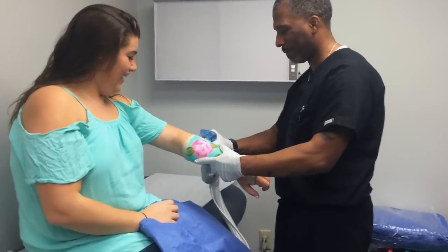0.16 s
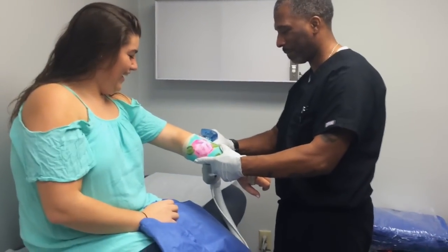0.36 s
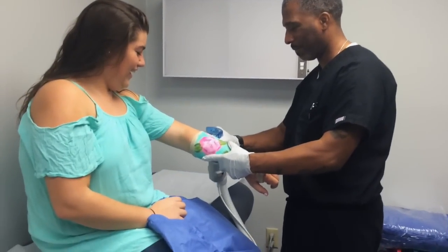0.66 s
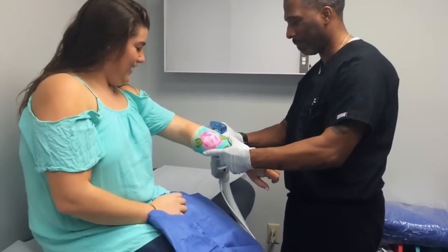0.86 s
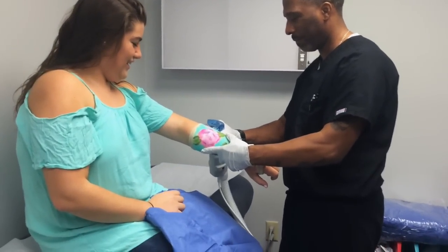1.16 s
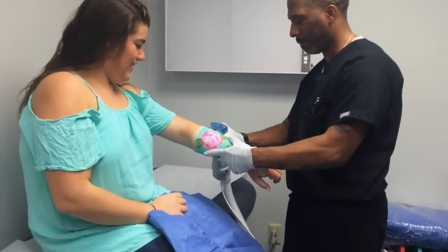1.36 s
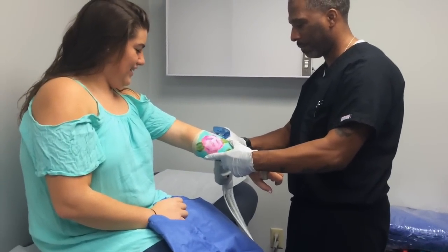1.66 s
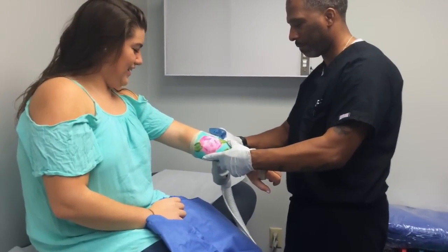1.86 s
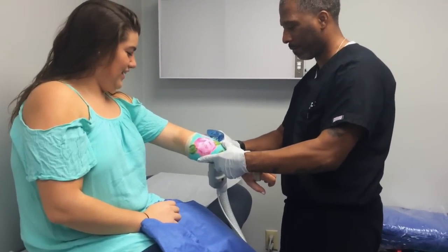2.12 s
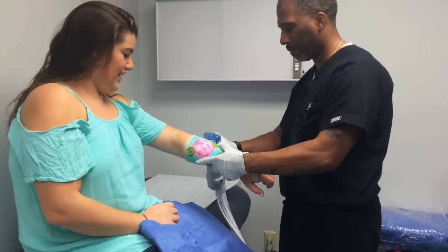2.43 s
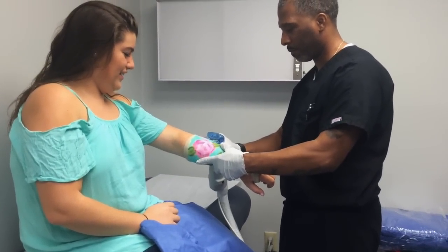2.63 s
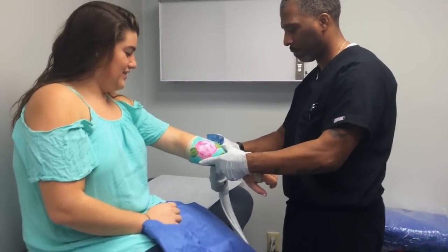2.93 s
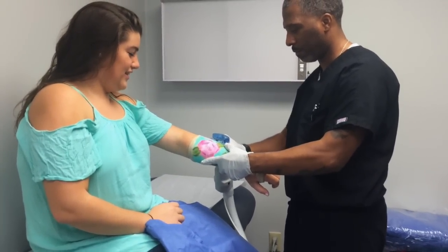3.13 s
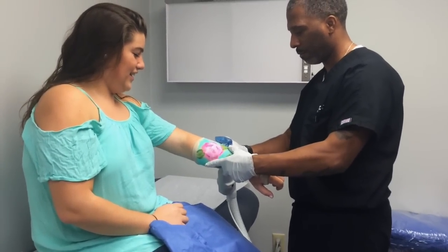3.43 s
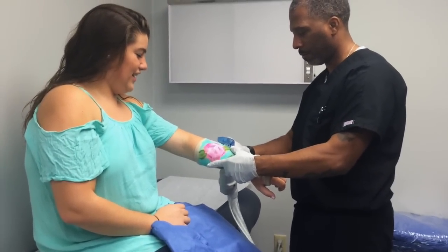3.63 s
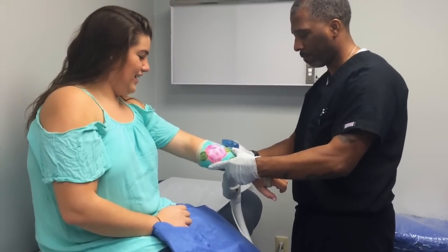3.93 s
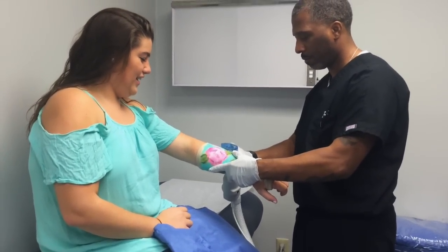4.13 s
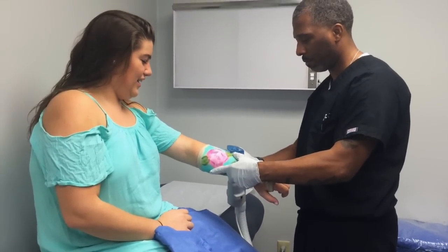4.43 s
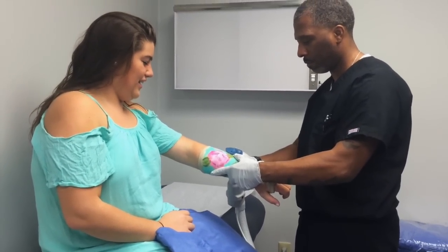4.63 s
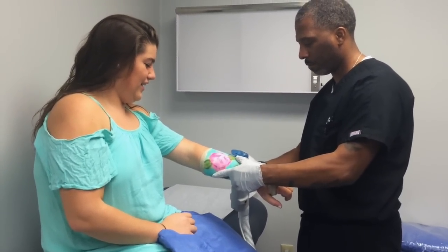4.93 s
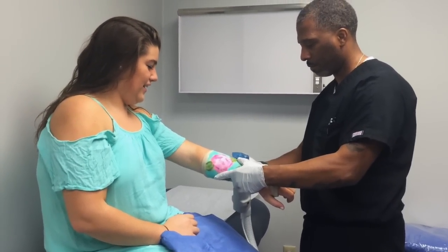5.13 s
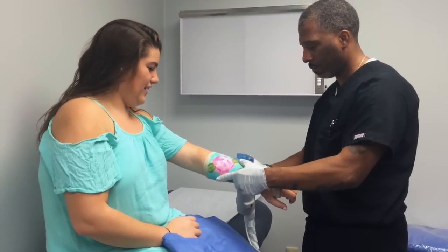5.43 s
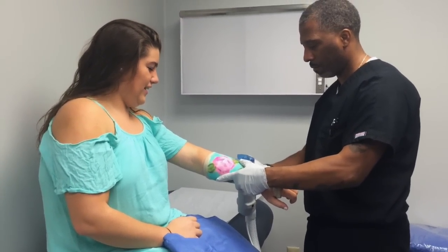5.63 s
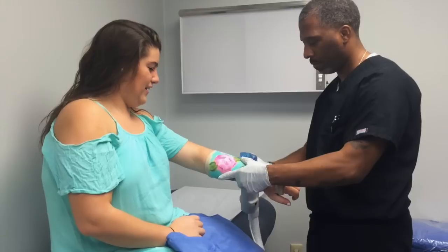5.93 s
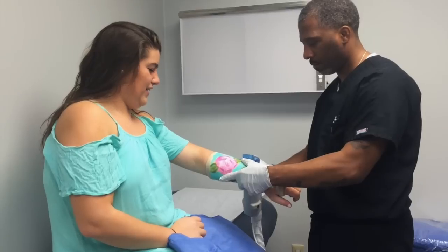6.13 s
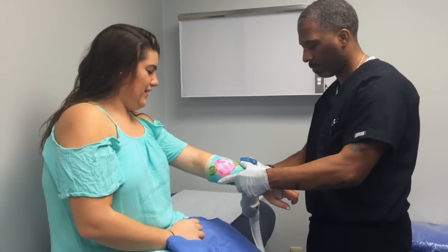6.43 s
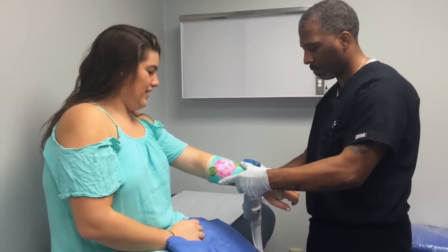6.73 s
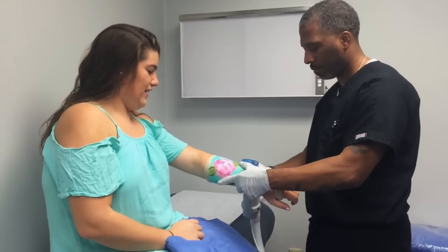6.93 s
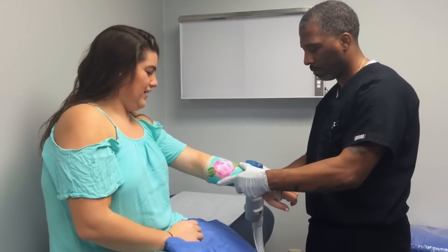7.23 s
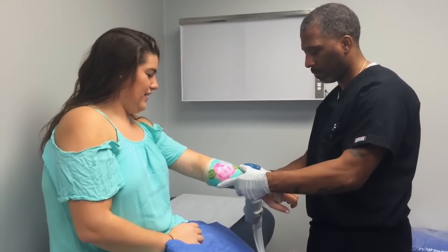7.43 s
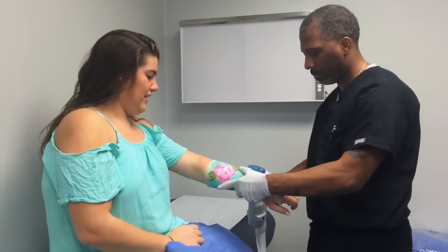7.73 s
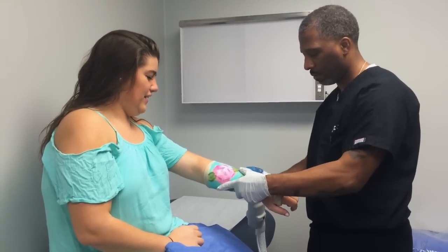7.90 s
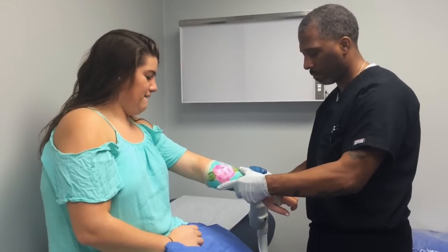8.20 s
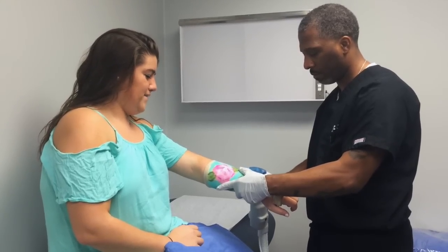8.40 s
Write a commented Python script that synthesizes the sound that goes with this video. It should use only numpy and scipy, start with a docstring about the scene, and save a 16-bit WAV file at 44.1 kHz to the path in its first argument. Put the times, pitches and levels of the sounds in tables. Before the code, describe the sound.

A cast saw is already running, its harsh buzzing whine jumping between overtones as the blade catches and slips. Early bites bring low, hollow grumbles and stronger buzzing from the cast; later the cutting becomes higher and more singing, with longer squeals. Dry dust scrapes throughout, over constant vacuum hum and airy hiss. Close, centred sound in a small hard room, still running at the end.

```python
"""Cast saw and dust vacuum

An oscillating saw is pressed again and again into a cast on a forearm, in a small clinic room.
Each press slows the motor; the blade sings on multiples of its stroke rate, made of trembling sines.
Gated noise through resonances chatters against the shell; coloured noise rasps off dust.
The dust vacuum runs beside it: sines hum and whistle, and filtered noise rushes."""
import sys
import numpy as np
from scipy import signal
from scipy.fft import rfft, irfft
from scipy.io import wavfile
from scipy.ndimage import uniform_filter1d

SR = 44100
rng = np.random.default_rng(int(sys.argv[2]) if len(sys.argv) > 2 else 0)


def put_to_file(sound):
    """Save the sound as 16-bit audio at rate SR, in the file named by the first command-line argument."""
    columns = np.atleast_2d(sound).T  # one column per channel
    safe = np.clip(columns, -1, 1)
    whole_steps = np.round(safe * 32767)
    wavfile.write(sys.argv[1], SR, whole_steps.astype(np.int16))


N = 377496
TIME = np.arange(N) / SR


def undb(db):
    """Decibels to gain."""
    return 10 ** (np.asarray(db) / 20)


def unit(x):
    """Scale to rms 1."""
    return x / np.sqrt(np.mean(x ** 2))


def curves(table):
    """Each column of a table after the first, joined by straight lines in time."""
    time_s, *columns = np.transpose(table)
    return [np.interp(TIME, time_s, column) for column in columns]


def walk(rate_hz):
    """Smooth random curve of rms 1 that changes about rate_hz times a second."""
    step = max(int(SR / rate_hz), 2)
    held = np.repeat(rng.standard_normal(N // step + 2), step)
    held = held[rng.integers(step):][:N]
    return unit(uniform_filter1d(uniform_filter1d(held, step), step))


def turn(hz):
    """Phase in radians of something turning at a changing rate, from a random start."""
    return 2 * np.pi * (np.cumsum(hz) / SR + rng.random())


def press(slowest_s, push_s, release_s):
    """One smooth push and release, 0-1."""
    u = (TIME - slowest_s) / np.where(TIME < slowest_s, push_s, release_s)
    return np.cos(np.pi / 2 * np.clip(u, -1, 1)) ** 2


def hold(start_s, length_s, edge_in_s=0.02, edge_out_s=0.019):
    """Attack, hold and release, 0-1; the ramps are centred on the start and the end."""
    attack = (TIME - start_s) / edge_in_s
    release = (start_s + length_s - TIME) / edge_out_s
    return np.clip(np.minimum(attack, release) + .5, 0, 1)


def bump(centre_s, length_s):
    """A short bell-shaped swell, 0-1."""
    return np.exp(-(2 * (TIME - centre_s) / length_s) ** 2)


def colour(x, points):
    """Give a sound an extra spectrum, joined in log frequency; rms 1."""
    hz, db = np.transpose(points)
    f = np.maximum(np.fft.rfftfreq(N, 1 / SR), 1)
    shape = undb(np.interp(np.log(f), np.log(hz), db))
    return unit(irfft(rfft(x) * shape, N))


def resonate(x, hz, width_hz):
    """A resonance applied twice, for steep skirts."""
    b, a = signal.iirpeak(hz, hz / width_hz, fs=SR)
    return signal.lfilter(b, a, signal.lfilter(b, a, x))


def room(x, t60_s=.3, tail_db=3):
    """Direct sound plus a short, dense decaying tail from the near walls; rms 1."""
    t = TIME[:SR // 2]
    tail = rng.standard_normal(len(t)) * undb(-60 * t / t60_s) * (t > .004)
    tail = tail / np.linalg.norm(tail)
    return unit(x + undb(tail_db) * signal.fftconvolve(x, tail)[:N])


# lines of the vacuum's motor: multiple [of shaft speed], level_db [rms, before a slight waver]
VACUUM_LINES = [(1, -43.5), (2, -62), (3, -47), (6, -42), (9, -60), (12, -54)]
# thin whistles, joined over time: time_s, upper_db, lower_db [both before a 0.5 dB trim and a waver]
WHISTLE_LEVELS = [(0, -37, -51), (0.598, -44, -42), (1, -52, -56), (1.5, -56, -55), (1.8, -53, -44),
                  (2.8, -52, -42), (3.3, -57, -55), (4, -53, -57), (4.35, -43, -59), (5.9, -41, -57),
                  (6.5, -47, -52), (7.5, -47, -52), (8.56, -50, -52)]
# mean pitch of the whistles: upper_hz, lower_hz
WHISTLE_PITCHES = (6795, 6670)
# colour of the air rush: pitch_hz, level_db [per Hz, relative]
AIR_SPECTRUM = [(20, -36), (40, -23), (52, -14), (66, -1.5), (90, -12), (180, -6), (290, -10), (400, -5),
                (560, -11.5), (1050, -6.5), (2000, -2.5), (5000, -2), (9000, -6), (15000, -26.5)]


def vacuum(shaft_hz=303.5, drift=0.000393, air_db=-33):
    """A motor with a few clean lines, two thin whistles sharing its drift, and air rushing in the hose."""
    speed = 1 + drift * walk(2)
    shaft = turn(shaft_hz * speed)
    hum = 0
    for multiple, db in VACUUM_LINES:
        waver_db = .5 * np.sqrt(multiple) * walk(3.95)  # the higher lines waver more
        hum = hum + undb(db + waver_db) * np.sin(multiple * shaft)
    whistles = 0
    for hz, db in zip(WHISTLE_PITCHES, curves(WHISTLE_LEVELS)):
        whistles = whistles + undb(db - 0.5 + 0.77 * walk(14)) * np.sin(turn(hz * speed))
    air = colour(rng.standard_normal(N), AIR_SPECTRUM) * undb(air_db + 0.13 * walk(5.5))
    return np.sqrt(2) * (hum + whistles) + air  # root 2 turns rms into sine peak


# deep bites into the cast: centre_s, length_s, grumble_db, buzz_db [added gain of the cast's buzz]
BITES = [(0.728, 0.073, -44, -45), (1.35, .12, -47, -47), (1.894, 0.21, -48, -50), (2.39, 0.08, -49, -42),
         (2.524, 0.21, -62, -40), (2.988, 0.14, -56, -41.5), (3.507, 0.1, -54, -38)]


def grumble():
    """Deep bites shake the whole cast in a low, hollow resonance."""
    swell = sum(undb(db) * bump(s, length) for s, length, db, _ in BITES)
    return swell * unit(resonate(rng.standard_normal(N), 358, 80))


# colour of the torn grains: pitch_hz, level_db [per Hz, relative]
RASP_SPECTRUM = [(300, -23.5), (700, -7.5), (1200, -1.5), (2000, 2.5), (2900, -1.5), (4200, -3.5),
                 (5200, -3.5), (6500, -5), (7200, -2.5), (8000, -4), (9200, -11), (12000, -11.5),
                 (15200, -16.5)]
# rasp between presses, joined over time: time_s, level_db [before a fixed trim_db lift]
RASP_LEVELS = [(0, -33), (1.5, -34.5), (3.2, -32.2), (5, -31), (8.56, -32.5)]


def rasp(stroke, tearing_db, depth=0.34, grain_db=2, flicker_db=1.0, trim_db=2.5):
    """The teeth tear off fine grains, most at one end of the swing and more in each press."""
    level_db = curves(RASP_LEVELS)[0] + tearing_db + 0.26 * walk(15)
    grains = rng.standard_normal(N) * undb(grain_db * walk(2000) + flicker_db * walk(35))
    swung = grains * (1 + depth * np.cos(stroke))
    return room(colour(swung, RASP_SPECTRUM)) * undb(level_db + trim_db)


# resonances of blade and shell: pitch_hz, width_hz [of each of two passes], level_db [relative]
SHELL = [(1048, 190, -3), (1380, 530, -5), (1526, 294, 3.5), (2036, 350, -0.5), (3950, 1600, -5)]


def chatter(stroke, load, scatter_db=5.5, load_db=0.3, chatter_db=-33.0):
    """Once a stroke the teeth catch and knock the shell, never twice alike."""
    cycle = stroke / (2 * np.pi) % 1
    gate = np.exp(-cycle / 0.18)
    knocks = gate * rng.standard_normal(N) * undb(scatter_db * walk(250))
    shell = sum(undb(db) * resonate(knocks, hz, width) for hz, width, db in SHELL)
    return room(shell) * undb(chatter_db + load_db * load)


def overtone(phase, swell_db, rough):
    """One line of the saw, rms 1: it swells and drops as the contact shifts, and trembles with the scraping."""
    # tanh makes it stay near one level, then slip to another
    grip = undb(swell_db * np.tanh(2 * walk(18)))
    phase = phase + 2 * np.pi * rng.random()  # shell and walls delay each line differently
    in_step = (1 + rough * walk(80)) * np.cos(phase)
    quarter_turn = rough * walk(80) * np.sin(phase)
    return unit(grip * (in_step + quarter_turn))


# the saw's motor hum: multiple [of stroke rate], level_db [before slips]
MOTOR_LINES = [(1, -55), (2, -53)]
# the cast's low buzz: multiple [of stroke rate], level_db [relative to the shaking]
BUZZ_LINES = [(3, -1), (4, 3)]


def buzz(stroke, sag_hz, shake_db=-48, shake_db_per_hz=0.37):
    """The motor hums at low multiples of its stroke; the cast buzzes more under pressure and in deep bites."""
    motor = sum(undb(db) * overtone(k * stroke, swell_db=2.2, rough=0.12) for k, db in MOTOR_LINES)
    cast = sum(undb(db) * overtone(k * stroke, swell_db=1.5, rough=0.41) for k, db in BUZZ_LINES)
    shake = undb(shake_db + shake_db_per_hz * sag_hz)
    shake = shake + sum(undb(db) * bump(s, length) for s, length, _, db in BITES)
    return motor + shake * cast


# steady whine, joined over time, before swells and slips:
# time_s, fifth_db, sixth_db, middle_db [seventh and eighth], upper_db [common level of the overtones]
WHINE_LEVELS = [(0, -30.5, -33, -33, -29), (.8, -28.5, -31, -33.5, -27.5), (1.1, -35.5, -25.5, -31.5, -27),
                (2.2, -34, -27.5, -33.5, -28), (2.7, -38, -27, -33.5, -27.5),
                (3.2, -29.5, -28.5, -34, -28.5), (4, -30.5, -28.5, -33.5, -27.5),
                (4.75, -32.5, -35.5, -33.5, -29), (5.2, -36.5, -31, -33.5, -27.5),
                (6.4, -36, -28.5, -37, -27), (7.3, -36.5, -24.5, -39.5, -26),
                (8.56, -39.5, -29.5, -33.5, -27.5)]
# higher overtones: multiple [of stroke rate], level_db [relative to their common level]
OVERTONES = [(9, -9), (10, -9.5), (11, -14), (12, -19), (13, -16), (14, -20), (15, -16.5), (16, -19),
             (17, -15), (18, -19), (20, -39)]
# the blade catches and sings out: start_s, length_s, multiple [of stroke rate], level_db [before slips]
SQUEALS = [(0.015, .06, 6, -22.5), (0.028, 0.075, 7, -25), (.1, 0.39, 6, -27), (0.225, .19, 8, -27),
           (.22, 0.11, 11, -32), (0.477, .18, 6, -26), (.59, 0.049, 11, -30), (0.694, 0.12, 5, -24),
           (0.784, 0.055, 6, -18.5), (.83, .07, 8, -28), (0.966, 0.1, 7, -29), (.95, 0.34, 9, -33.5),
           (1.053, .15, 8, -26.5), (1.2, 0.27, 6, -24.5), (1.32, 0.095, 5, -26), (1.67, .14, 6, -23),
           (1.856, .2, 6, -25), (1.992, 0.085, 8, -27), (2.25, .14, 6, -25), (2.38, .15, 5, -29.5),
           (2.388, 0.11, 6, -19.5), (2.45, .08, 9, -26.5), (2.75, 0.11, 8, -27), (2.771, 0.094, 6, -24),
           (3.093, 0.11, 6, -26.5), (3.28, 0.25, 5, -24.5), (3.5, .08, 8, -28.5), (4.396, 0.091, 6, -24.5),
           (4.5, 0.083, 5, -27.5), (4.963, 0.24, 6, -25.5), (4.993, 0.19, 8, -27), (5.25, 0.11, 5, -30),
           (5.501, .23, 8, -29.5), (5.708, .06, 6, -20.5), (6.02, .09, 6, -23), (6.11, 0.15, 8, -26.5),
           (6.249, 0.066, 6, -20.5), (6.34, 0.049, 5, -27.5), (6.57, 0.35, 6, -21.7), (6.94, 0.1, 7, -28),
           (7.217, 0.4, 6, -22), (7.69, .11, 6, -21.5), (7.798, 0.084, 8, -26.5), (7.891, 0.28, 6, -23.5),
           (8.2, 0.064, 6, -21), (8.211, 0.31, 8, -29), (8.41, .2, 6, -24.5)]


def blade(stroke, load, rough=0.19, upper_rough=0.3, bite_db=1.5, swell_db=3.0,
          middle_swell_db=3.5, upper_swell_db=6.0, held_db=.5, steal_db=-3.5):
    """The pitched whine: each overtone swells by chance until the blade catches and holds it in a squeal."""
    bite = undb(bite_db * load)  # a skimming blade sings cleanly, a buried one grates
    holds = [hold(s, length) for s, length, _, _ in SQUEALS]
    # a squeal draws energy from the steady whine on the sixth multiple
    stolen_db = steal_db * np.max(holds, axis=0)

    def sing(order, db, swell, tremble):
        """One multiple of the stroke rate, with its squeals."""
        gain = undb(db) * unit(undb(swell * np.tanh(2 * walk(20))))
        for held, (_, _, multiple, squeal_db) in zip(holds, SQUEALS):
            if round(multiple) == order:
                gain = gain + held * (undb(squeal_db) - gain)  # crossfade to the squeal level
        return gain * overtone(order * stroke, swell_db=held_db, rough=tremble * bite)

    fifth_db, sixth_db, middle_db, upper_db = curves(WHINE_LEVELS)
    fifth = sing(5, fifth_db, swell_db, rough)
    sixth = sing(6, sixth_db + stolen_db, swell_db, rough)
    middle = sum(sing(k, middle_db, middle_swell_db, upper_rough) for k in (7, 8))
    upper = sum(sing(round(k), upper_db + db, upper_swell_db, upper_rough) for k, db in OVERTONES)
    return fifth + sixth + middle + upper


# the teeth lose their grip and the whine dips: start_s, length_s, change_db
SLIPS = [(0.429, 0.053, -6), (0.913, 0.032, -6), (1.444, 0.042, -8.5), (1.52, .05, -1.5), (2.62, 0.12, -2),
         (5.371, 0.042, -3), (5.931, 0.06, -2.5), (6.863, 0.028, -8), (7.062, 0.051, -3),
         (7.62, 0.062, -3.5)]


def slips():
    """Level change in dB while the teeth lose their grip."""
    return sum(db * hold(s, length) for s, length, db in SLIPS)


# the blade is pressed into the cast:
# slowest_s, push_s, release_s, slowing_hz, lead_s [tearing peaks earlier by this], tearing_db [extra rasp]
PRESSES = [(0.281, 0.27, 0.54, 5.8, .12, 2), (0.751, 0.23, .34, 8.7, 0.044, 3),
           (1.319, .21, 0.41, 6.4, 0.11, 5), (1.951, .32, 0.28, 8.9, .14, 4),
           (2.51, .35, 0.37, 4.36, 0.17, 5), (3.04, 0.28, 0.41, 6.6, 0.083, 4),
           (3.69, 0.36, 0.25, 9.2, .11, 3), (4.1, 0.19, 0.16, 0.41, 0.061, 3.5),
           (4.76, 0.46, .29, 6.2, .25, 2.5), (5.341, .32, 0.22, 3.46, .27, 1.5),
           (5.88, .3, .24, 2.8, 0.2, 3.5), (6.41, 0.25, 0.41, 4.3, 0.17, 2.6),
           (6.98, .27, .19, 4.6, 0.27, 1.2), (7.42, .3, 0.2617, 1.87, 0.13, 2),
           (8.01, .16, .25, 3.28, 0.061, 3), (8.66, .35, .3, 4.56, 0.17, 4)]


def presses(tear_s=0.28):
    """Pressing slows the motor (Hz) and tears harder (dB); tear_s is both rise and fall of the tearing."""
    sag_hz = sum(hz * press(s, push, release) for s, push, release, hz, _, _ in PRESSES)
    tearing_db = sum(db * press(s - lead, tear_s, tear_s) for s, _, _, _, lead, db in PRESSES)
    return sag_hz, tearing_db


def scene(free_hz=252.75, slip_chatter=0.23):
    """Vacuum and saw, the same in both channels; free_hz is the mean stroke rate with no load."""
    sag_hz, tearing_db = presses()
    load = (sag_hz - sag_hz.mean()) / sag_hz.std()
    stroke = turn((free_hz - sag_hz) * (1 + .0007 * walk(30)))
    slip_db = slips()
    background = vacuum() + grumble()
    # the chatter follows only a share of each dip
    scraping = rasp(stroke, tearing_db) + undb(slip_chatter * slip_db) * chatter(stroke, load)
    whine = undb(slip_db) * (buzz(stroke, sag_hz) + blade(stroke, load))
    return np.tile(background + scraping + whine, (2, 1))


def record(dry, ceiling=0.4, top_hz=15250):
    """The recorder rounds the highest peaks and cuts the top."""
    rounded = dry / (1 + (dry / ceiling) ** 4) ** (1 / 4)
    lowpass = signal.ellip(12, .1, 90, top_hz, fs=SR, output="sos")
    return signal.sosfilt(lowpass, rounded)


dry = scene()
out = record(dry)
put_to_file(out)
```